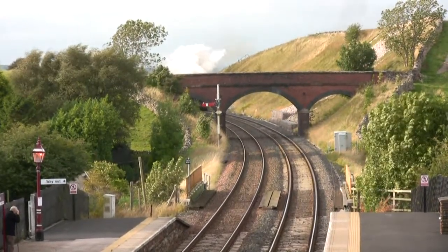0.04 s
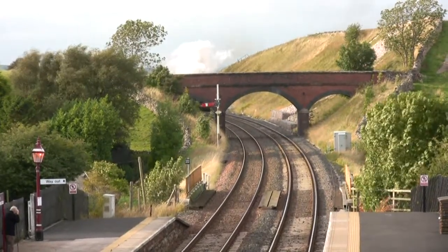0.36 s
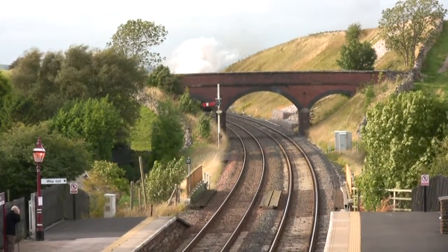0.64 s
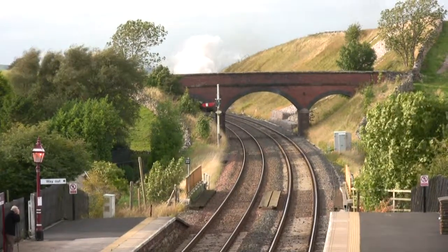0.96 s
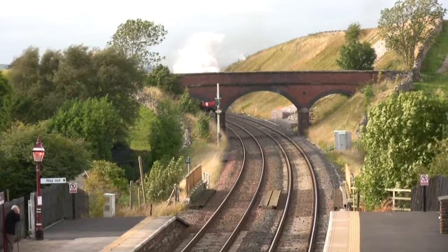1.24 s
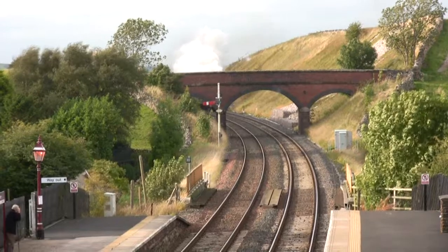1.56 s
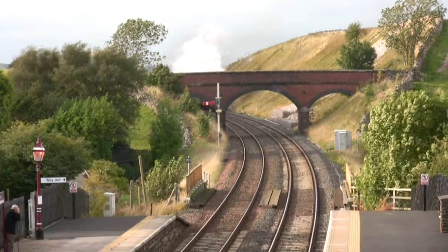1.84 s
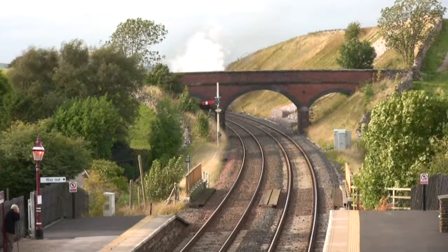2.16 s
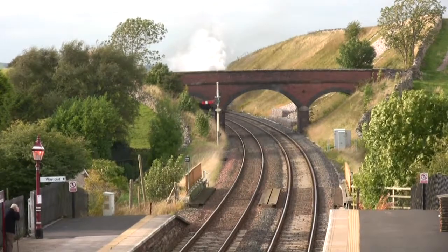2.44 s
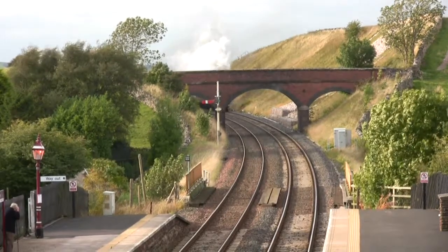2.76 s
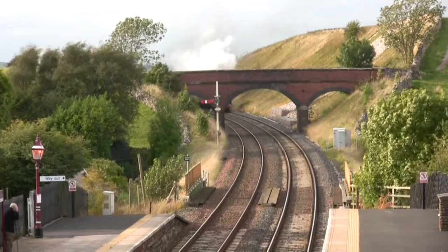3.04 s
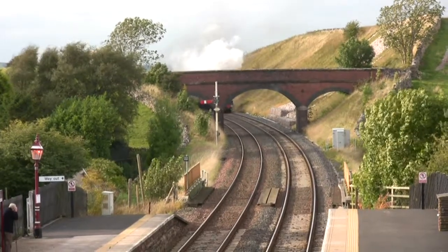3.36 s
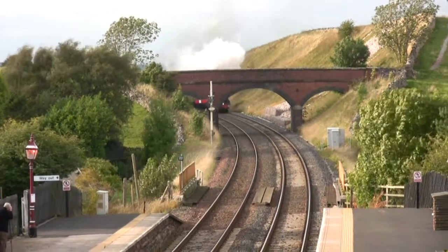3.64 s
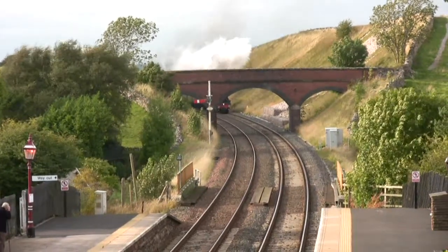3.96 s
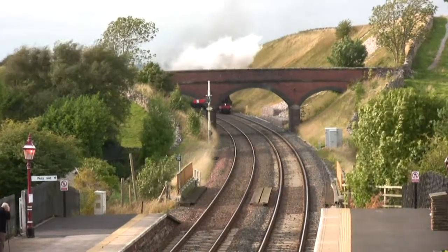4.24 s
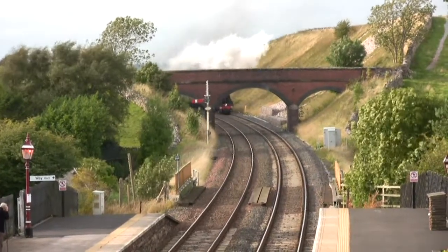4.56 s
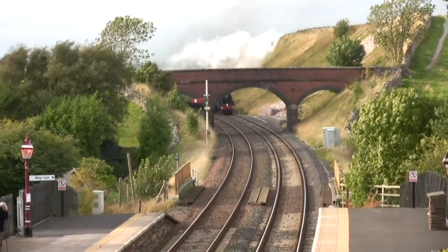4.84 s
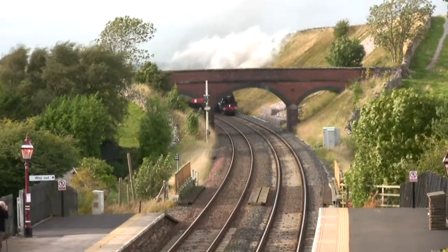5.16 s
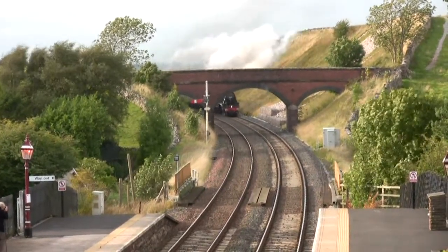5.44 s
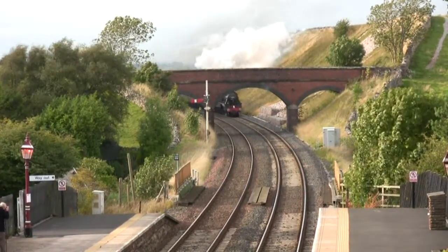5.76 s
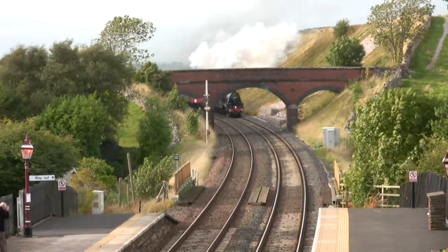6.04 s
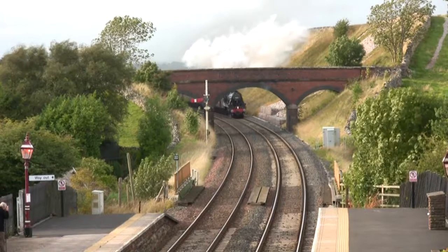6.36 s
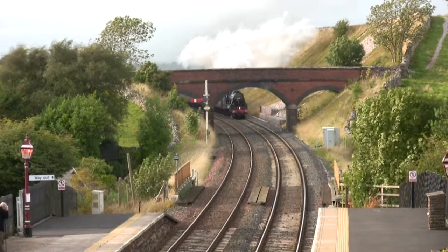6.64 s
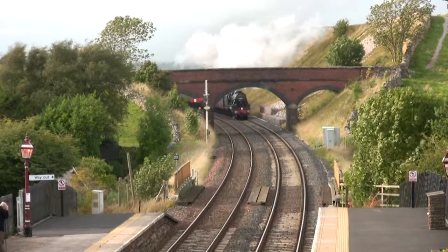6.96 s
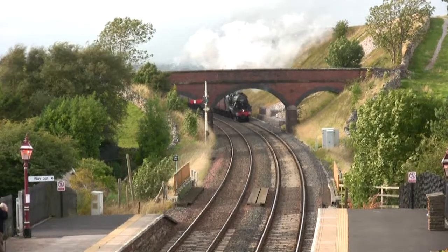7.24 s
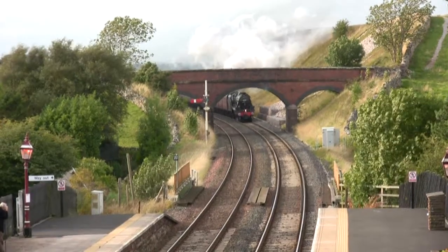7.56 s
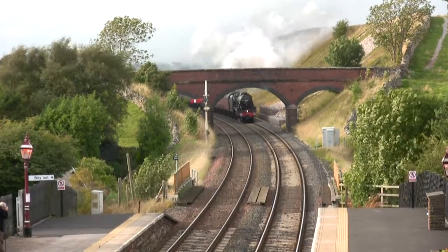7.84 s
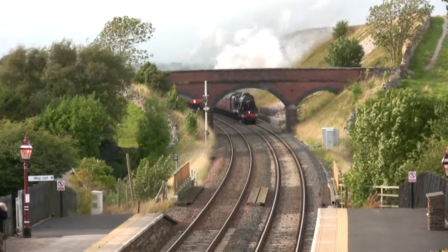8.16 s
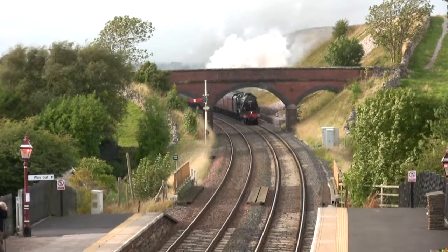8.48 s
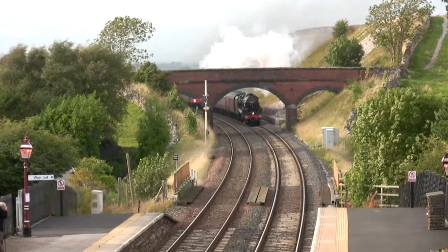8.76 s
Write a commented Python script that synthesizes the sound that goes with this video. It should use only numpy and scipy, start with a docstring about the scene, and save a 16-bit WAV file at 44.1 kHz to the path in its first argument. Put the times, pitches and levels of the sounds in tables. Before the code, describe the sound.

A steam locomotive approaches through an outdoor cutting, heard from straight ahead. From the start its exhaust chuffs quickly in a limping four-beat rhythm, about eleven beats a second, each a hollow thump with a bark and a steamy rasp, followed by short dull echoes. Carriages rumble and wheels roar softly underneath. The chuffing is distant for the first three seconds, then swells from about 3.5 seconds, with a sharp flare near 4.6 seconds and a few low booms around it. One brief metallic clink and a spit of steam come at about 5.2 seconds. The beats grow louder and harsher, strongest from 8.5 seconds to the end at 9, with two more short spits. A breeze buffets the microphone throughout, gusting most around 3 seconds, over a faint hiss and a barely audible thin whine. Faint close rustles recur, with small dry clicks near 3, 5, 6 and 7 seconds.

```python
"""A grassy cutting with a brick bridge, on the way to a country station: a steam locomotive works hard.
Its exhaust limps along at four beats per wheel turn, each a hollow thump in the chimney with a bark and
a rasp of steam above it, echoing off bridge and banks. Carriages rumble and wheels roar on the rails.
A breeze buffets the microphone over a faint hiss and a thin electronic whine, and something close by
rustles and clicks now and then."""
import sys
import numpy as np
from scipy import signal
from scipy.fft import rfft, irfft, next_fast_len
from scipy.io import wavfile
from scipy.ndimage import uniform_filter1d

SR = 44100
rng = np.random.default_rng(int(sys.argv[2]) if len(sys.argv) > 2 else 0)


def store_wav(level_fs):
    """Save 16-bit WAV to argv[1]."""
    pcm = np.round(np.clip(np.atleast_2d(level_fs), -1, 1) * 32767)
    wavfile.write(sys.argv[1], SR, pcm.T.astype(np.int16))


N = 397341
TIME = np.arange(N) / SR


def from_db(db):
    """Decibels to gain."""
    return 10 ** (np.asarray(db) / 20)


def automation(rows):
    """One curve per column, drawn through the breakpoint times in the first."""
    times, *columns = np.transpose(rows)
    return [np.interp(TIME, times, column) for column in columns]


def coloured(spectrum):
    """Noise of rms 1 with a given spectrum that falls away steeply beyond its ends."""
    points_hz, db = np.transpose(spectrum)
    size = next_fast_len(N)
    hz = np.maximum(np.fft.rfftfreq(size, 1 / SR), 1)
    gain = from_db(np.interp(np.log(hz), np.log(points_hz), db))
    skirts = np.minimum(1, np.minimum(hz / points_hz[0], points_hz[-1] / hz)) ** 2
    noise = irfft(rfft(rng.standard_normal(size)) * gain * skirts, size)[:N]
    return noise / np.std(noise)


def drift(rate_hz):
    """Smooth random modulation with a spread of 1."""
    step = 16
    size = next_fast_len(N // step + 2)
    hz = np.fft.rfftfreq(size, step / SR)
    slow = irfft(rfft(rng.standard_normal(size)) / (1 + (hz / rate_hz) ** 2) ** 2, size)
    return np.interp(TIME, np.arange(size) * step / SR, slow / np.std(slow))


def resonant(hz, width_hz):
    """Noise ringing in one steep-sided resonance with a moving centre."""
    phase = 2 * np.pi * np.cumsum(hz) / SR
    return (drift(width_hz) * np.cos(phase) + drift(width_hz) * np.sin(phase)) / np.sqrt(2)


def evened(x, span_s):
    """Keeps the grain of a noise but holds its level steady."""
    size = int(span_s * SR)
    return x / np.sqrt(uniform_filter1d(uniform_filter1d(x * x, size), size) + 1e-9)


def lowpass(x, hz, order=1):
    """Rolls off the top."""
    return signal.sosfilt(signal.butter(order, hz, fs=SR, output="sos"), x)


def tilted(x, pivot_hz, tilt_db):
    """Tilt EQ: raises the part above the pivot against the part below."""
    low = signal.sosfiltfilt(signal.butter(3, pivot_hz, fs=SR, output="sos"), x)
    return low * from_db(-tilt_db / 2) + (x - low) * from_db(tilt_db / 2)


def swell(peak_s, rise_s, fall_s):
    """A rounded attack to 1, then a dying tail: returns the slice of time and the shape."""
    span = slice(max(int((peak_s - 4 * rise_s) * SR), 0), int((peak_s + 8 * fall_s) * SR))
    t = TIME[span] - peak_s
    attack = np.exp(-.5 * (t / rise_s) ** 2)
    tail = np.exp(.5 - np.hypot(t / fall_s, .5))
    return span, np.where(t < 0, attack, tail)


def bursts(rows):
    """Envelope of swells (t/s, level/dB, rise/s, fall/s), added in power."""
    power = np.zeros(N)
    for s, db, rise_s, fall_s in rows:
        span, shape = swell(s, rise_s, fall_s)
        power[span] += (from_db(db) * shape) ** 2
    return np.sqrt(power)


def hits(cues, rise_s, fall_s):
    """Envelope of cues (t/s, level/dB) that share one shape."""
    return bursts((s, db, rise_s, fall_s) for s, db in cues)


def ringing(cues, width_hz, rise_s, fall_s):
    """Short swells of narrow-band noise, each at its own pitch."""
    grain = drift(width_hz) + 1j * drift(width_hz)
    grain /= np.sqrt(.5 + np.abs(grain) ** 2 / 4)   # tames the flutter within a swell
    out = np.zeros(N)
    for s, db, hz in cues:
        span, shape = swell(s, rise_s, fall_s)
        out[span] += from_db(db) * shape * np.real(grain[span] * np.exp(2j * np.pi * hz * TIME[span]))
    return out


def moving_air(x, share, lag_s, wander):
    """Distant sound also arrives by slightly longer paths that shift with the air."""
    late = sum(np.interp(TIME - k * lag_s * (1 + wander * drift(1.21)), TIME, x) for k in (1, 2))
    return (x + share * late) / np.sqrt(1 + 2 * share ** 2)


# Comb of the ground bounce: t/s, first dip f/Hz, reflected share
GROUND_BOUNCE = [(5.4, 1443, 0.02), (6.4, 1300, 0.25), (7.05, 879.3, 0.26), (7.7, 830, 0.27),
                 (8.3, 673, .22), (9, 594, 0.12)]

def over_ground(x):
    """A grazing reflection returns inverted; its lag grows as the train nears, so the dips slide down."""
    dip_hz, share = automation(GROUND_BOUNCE)
    bounce = signal.sosfiltfilt(signal.butter(2, 2800, fs=SR, output="sos"), x)   # ballast scatters highs
    return (x - share * np.interp(TIME - 1 / dip_hz, TIME, bounce)) / np.sqrt(1 + share ** 2)


# Exhaust tone along the curve: t/s, chimney base f/Hz, relative overtone level/dB, bark tilt/dB
EXHAUST_TONE = [(0, 255.3, 0.5, 9), (.9, 253.8, 4.5, 3), (1.7, 230.1, -18, -1), (3.5, 253, -4, 5),
                (4.3, 248.9, -8.5, 7), (4.7, 238.2, 3.5, 14), (5.8, 218.7, -8, -4), (6.6, 237.7, -3, -8),
                (7.2, 234, -4.5, -10), (7.8, 281.1, -2, -3), (9, 242.1, -4, 3)]
# Spectrum of the chimney's broad body: f/Hz, level/dB
BODY_EQ = [(150, -9), (190, -3.5), (290, -3), (322, -3.5), (360, 2), (415, -5), (455, -13.5)]

def chimney(body_db):
    """The chimney rings with a hollow, wavering note and its overtone, on a broad rush."""
    base_hz, overtone_db, _ = automation(EXHAUST_TONE)
    wavering_hz = base_hz * (1 + .01509 * drift(5.994))
    note = evened(resonant(.98 * wavering_hz, width_hz=51.6), span_s=.018)
    overtone = evened(resonant(1.58 * wavering_hz, width_hz=121), span_s=.032)
    body = from_db(body_db + .3 * overtone_db) * coloured(BODY_EQ)
    return note + from_db(overtone_db - 1.5) * overtone + body


# Fader rides of the rolling train: t/s, relative rumble level/dB, relative roar level/dB
ROLLING_FADERS = [(0, -24, -28), (1.2, -23, -27), (2.4, -31, -26.5), (3.3, -24.5, -24.5), (3.7, -22, -28.5),
                  (4.2, -21.5, -22.5), (4.8, -18, -26), (5.3, -17.5, -24.5), (6.4, -21.5, -24.5),
                  (7.4, -21, -22.5), (8.2, -20, -21.5), (8.55, -28, -27), (9.01, -24, -20)]
# Spectra of carriage rumble and wheel roar: f/Hz, level/dB
RUMBLE_EQ = [(70, -1.5), (105, -6), (160, -2), (235, -7.5), (320, -8), (410, -10.5), (480, -18.5),
             (800, -31)]
ROAR_EQ = [(350, -6.5), (550, -1), (950, 2), (1400, -4.5), (2300, -13.5), (3200, -14.5), (4000, -24.5),
           (5500, -31.5), (9000, -46)]

def rolling_train():
    """Carriages rumble, wheels roar on the rails, and the exhaust blurs to a drone between the banks."""
    rumble_db, roar_db = automation(ROLLING_FADERS)
    rumble = evened(coloured(RUMBLE_EQ) + from_db(-5.5) * chimney(body_db=-10), span_s=.051)
    roar = over_ground(moving_air(coloured(ROAR_EQ), share=.19, lag_s=.0073, wander=.03))
    return from_db(rumble_db - 6) * rumble + from_db(roar_db - 3.5) * roar


# Lulls in the breeze: t/s, depth/dB (negative lifts it), rise and fall/s
LULL_CUES = [(1.62, 4.5, 0.25), (2.05, -2, .08), (3.35, 4, 0.12), (6.4, 1.5, 0.26), (8.5, 2, 0.36)]
# Gusts: t/s, level/dB, rise and fall/s
GUST_CUES = [(.11, -10, 0.035), (.42, -20, 0.065), (.88, -18.5, .1), (1.17, -17, 0.061),
             (2.26, -12.5, 0.08), (2.42, -12, 0.032), (2.63, -12, 0.06), (2.81, -6.5, 0.036),
             (2.98, -14.5, .035), (3.14, -10, 0.013), (3.76, -9.5, 0.033), (4.25, -16.5, 0.69),
             (4.87, -13.5, 0.067), (5.64, -14.5, 0.049), (6.08, -11.5, 0.034), (6.72, -15, 0.048),
             (7.12, -19, .08), (7.47, -10, 0.03), (7.98, -22, .035), (8.73, -17, 0.027)]
# Spectrum of wind on the microphone: f/Hz, level/dB
BUFFET_EQ = [(7, 0.5), (14, 2), (35, 1.5), (62, -4), (85, -14), (130, -19), (250, -47), (600, -63)]

def breeze():
    """Lumpy low pressure with gusts and lulls, almost the same on both capsules."""
    lull_db = sum(db * bursts([(s, 0, span_s, span_s)]) for s, db, span_s in LULL_CUES)
    bed = from_db(-18.5 + 2 * drift(5.7) - lull_db)
    gusts = bursts((s, db, span_s, span_s) for s, db, span_s in GUST_CUES)
    centre = evened(coloured(BUFFET_EQ), span_s=.024)
    sides = np.array([coloured(BUFFET_EQ), coloured(BUFFET_EQ)])
    return np.hypot(bed, gusts) * (centre + from_db(-16) * sides)


# Spectrum of the outdoor hiss: f/Hz, level/dB
AIR_EQ = [(2000, -75), (5000, 13), (8000, 23.5), (11000, 17.5), (15500, 14)]

def noise_floor():
    """Faint outdoor hiss, the microphone's electronic noise, and a thin high whine."""
    hiss = from_db(-62.5) * coloured(AIR_EQ)
    self_noise = from_db(-70.5) * rng.standard_normal((2, N))
    whine = from_db(-84) * np.sin(2 * np.pi * 15625 * TIME)
    return hiss + self_noise + whine


# The limping four-beat groove: position/turns, thump accent/dB, bark accent/dB, rasp accent/dB
GROOVE = [(0, 3, 3.1, 3.5), (.26, -0.3, 2, -0.6), (.456, -0.5, 0.8, -0.3), (.746, 0.8, 0.9, 0.5)]
# Fader rides as the engine rounds the curve: t/s, then relative level/dB of thump, bark and rasp
EXHAUST_FADERS = [(0, -25, -25.5, -33), (1.35, -25, -25.5, -33), (1.6, -21.5, -38, -34),
                  (2.65, -19.5, -28, -32.5), (3.45, -12.5, -21.5, -28), (3.85, -15.5, -18.5, -26),
                  (4.3, -12, -26, -30.5), (4.95, -15.5, -17.5, -27.5), (5.2, -8.5, -22.5, -24.5),
                  (5.72, -10.5, -24, -28.5), (5.95, -10.5, -17, -24.5), (6.65, -9, -13.5, -24),
                  (7.25, -12, -20.5, -25), (7.5, -16.5, -17, -17.5), (7.95, -12, -18, -24.5),
                  (8.45, -13.5, -12.5, -18), (8.78, -13, -12.5, -25.5), (9.01, -13, -10, -20.5)]

def exhaust_beats():
    """Four beats per turn of the slowing wheels: cues (t/s, level/dB) for thump, bark and rasp."""
    turn_count, first_beat_s, turn_s, slowing_s_per_turn = 26, .035, .3487, .00028
    position, *accents_db = np.tile(np.transpose(GROOVE), turn_count)
    turns = np.repeat(np.arange(turn_count), len(GROOVE)) + position
    jitter_s, scatter_db = (rng.standard_normal((len(turns), 2)) * [.0014, 1.56]).T
    times = first_beat_s + turn_s * turns + slowing_s_per_turn * turns ** 2 / 2 + jitter_s
    fader_times, *faders_db = np.transpose(EXHAUST_FADERS)
    return [zip(times, np.interp(times, fader_times, fader_db) + accent_db + scatter_db)
            for fader_db, accent_db in zip(faders_db, accents_db)]


def chimney_thump(beats):
    """Each release of steam booms in the chimney."""
    tone = evened(chimney(body_db=-3), span_s=.037)
    return from_db(-3.5) * tone * hits(beats, rise_s=.017, fall_s=.021)


# Spectrum of the blast: f/Hz, level/dB
BARK_EQ = [(330, -5), (440, -3), (540, 10.5), (660, 0), (850, 7.5), (1080, 7.5), (1300, 0), (1700, -41)]

def blast_bark(beats, tearing):
    """The blast tears into the air above the chimney with a midrange bark."""
    _, _, tilt_db = automation(EXHAUST_TONE)
    blast = tilted(coloured(BARK_EQ), pivot_hz=750, tilt_db=tilt_db + 1.5 * drift(8.9))
    distant = over_ground(moving_air(blast, share=.4, lag_s=.0052, wander=.078))
    return from_db(-6) * evened(distant * tearing, span_s=.028) * hits(beats, rise_s=.02, fall_s=.02)


# Spectrum of the steam jet: f/Hz, level/dB
RASP_EQ = [(950, -15), (1300, 3), (1850, 1.5), (2500, -2), (3200, -3), (3700, -12), (5000, -25.5),
           (7000, -37), (12000, -95)]

def steam_rasp(beats, tearing):
    """The ragged jet puts a bright edge on each beat."""
    jet = tilted(coloured(RASP_EQ), pivot_hz=2000, tilt_db=2 * drift(2.7) - .8)
    distant = over_ground(moving_air(jet, share=.36, lag_s=.0021, wander=.091))
    return from_db(-1) * evened(distant * tearing, span_s=.014) * hits(beats, rise_s=.014, fall_s=.02)


# Slapback off bridge and banks: delay/s, level/dB
ECHO_TAPS = [(.05, -13), (.128, -20)]

def cutting_echoes(x):
    """Bridge and banks throw back dull echoes."""
    dull = lowpass(x, 2500)
    return sum(from_db(db) * np.interp(TIME - delay, TIME, dull, left=0) for delay, db in ECHO_TAPS)


# Flares of the blast: t/s, level/dB
FLARE_CUES = [(.385, -34.5), (1.435, -32), (2.747, -33), (3.342, -30), (4.05, -31), (4.507, -23),
              (4.588, -15), (4.68, -23.5), (4.76, -31), (6.004, -26), (6.265, -28), (6.627, -25),
              (6.978, -24.5), (7.419, -24), (8.572, -21.5)]
# Spectrum of a flare: f/Hz, level/dB
FLARE_EQ = [(1050, -6), (1400, 5), (1950, -0.5), (2600, -0.5), (3200, -2), (3600, -15), (5000, -47)]

def blast_flares(tearing):
    """On some beats the blast flares with extra bite."""
    blast = evened(coloured(FLARE_EQ) * tearing, span_s=.014)
    return blast * hits(FLARE_CUES, rise_s=.013, fall_s=.02)


# Low booms: t/s, level/dB, f/Hz
BOOM_CUES = [(.92, -21, 102.2), (3.53, -19, 135.4), (4.38, -16.5, 155.6), (4.77, -14.5, 140),
             (7.75, -21, 166.9), (7.97, -30, 162.2)]

def booms():
    """Low, pitched booms roll along the cutting."""
    return ringing(BOOM_CUES, width_hz=28, rise_s=.03, fall_s=.055)


def stereo_noise(spectrum):
    """Mid-side noise with a little width."""
    return coloured(spectrum) + from_db(-17) * coloured(spectrum) * np.array([[1], [-1]])


# Close rustles: t/s, level/dB, rise/s
RUSTLE_CUES = [(1.69, -57, .04), (2.58, -58, .05), (4.85, -63, 0.075), (5.03, -58, .06), (5.69, -59, 0.037),
               (5.88, -60, 0.088), (6.63, -56, 0.043), (7.16, -55, 0.05), (7.76, -52.5, 0.043),
               (8.28, -53, 0.054), (8.76, -62, .04)]
# Spectrum of a rustle: f/Hz, level/dB
RUSTLE_EQ = [(3000, -19), (6000, 2), (8200, 7), (11000, 0), (15500, -7)]

def rustles(grit):
    """Something brushes softly near the microphone."""
    envelope = bursts((s, db, rise_s, .028) for s, db, rise_s in RUSTLE_CUES)
    return grit * stereo_noise(RUSTLE_EQ) * envelope


# Close clicks: t/s, level/dB
CLICK_CUES = [(3.228, -38), (3.243, -39.5), (3.262, -40), (5.150, -44), (5.162, -47), (6.235, -43),
              (6.253, -36.5), (6.264, -39), (6.771, -36), (6.799, -51), (6.828, -45), (6.854, -45)]
# Spectrum of a click: f/Hz, level/dB
CLICK_EQ = [(2000, -34), (3500, 16), (5500, 7), (8000, 7.5), (9800, 6.5), (11500, 2), (15500, -10)]

def clicks(grit):
    """Small dry clicks in clusters, just right of centre."""
    envelope = hits(((s + .00058, db) for s, db in CLICK_CUES), rise_s=.0008, fall_s=.005)
    pan = from_db([[-1], [1]])
    return grit * stereo_noise(CLICK_EQ) * envelope * pan


# Spits of steam: t/s, level/dB
SPIT_CUES = [(4.948, -43), (5.155, -35), (6.716, -40), (8.744, -33), (8.838, -33)]
# Spectrum of a spit: f/Hz, level/dB
SPIT_EQ = [(3000, 7), (3700, 2), (4700, 3.5), (5800, -8), (8000, -41)]

def steam_spits(tearing):
    """Steam spits on a few beats, short and sibilant."""
    return coloured(SPIT_EQ) * tearing * hits(SPIT_CUES, rise_s=.011, fall_s=.014)


# Clink of the running gear: t/s, level/dB, f/Hz
CLINK_CUES = [(5.159, -20.5, 3250)]

def gear_clink():
    """The running gear rings once, brief and bright."""
    return ringing(CLINK_CUES, width_hz=530, rise_s=.0065, fall_s=.0096)


def scene():
    """The train sits dead centre; the breeze and the close sounds add a little width."""
    thump_beats, bark_beats, rasp_beats = exhaust_beats()
    tearing = from_db(2 * drift(120))   # the jet is ragged within each beat
    engine = chimney_thump(thump_beats) + blast_bark(bark_beats, tearing)
    engine += steam_rasp(rasp_beats, tearing) + blast_flares(tearing)
    engine += booms() + steam_spits(tearing) + gear_clink()
    beds = rolling_train() + breeze() + noise_floor()
    grit = from_db(2.2 * drift(500))   # fast flutter roughens the close sounds
    return beds + engine + cutting_echoes(engine) + rustles(grit) + clicks(grit)


def record(dry):
    """The left capsule has less bass than the right; peaks are soft-clipped and the top is cut."""
    left, right = dry
    left_bass = lowpass(lowpass(left, 46), 600)
    stereo = np.array([left - .78 * left_bass, right])
    rounded = stereo / (1 + stereo ** 8) ** (1 / 8)
    high_cut = signal.ellip(14, .1, 80, 15750, fs=SR, output="sos")
    return signal.sosfilt(high_cut, rounded)


dry = scene()
out = record(dry)
store_wav(out)
```